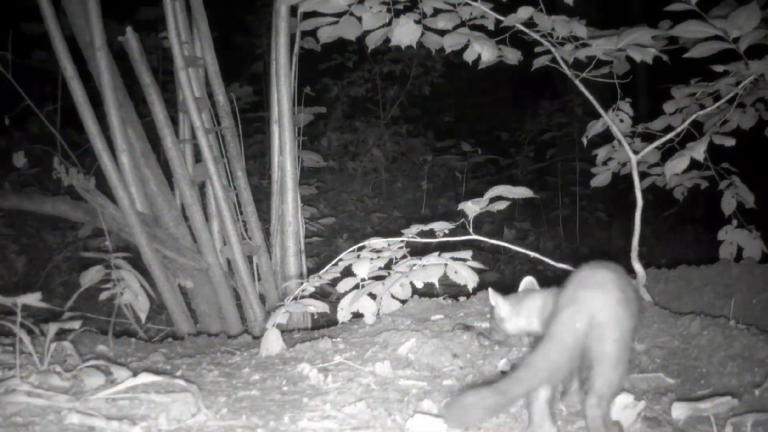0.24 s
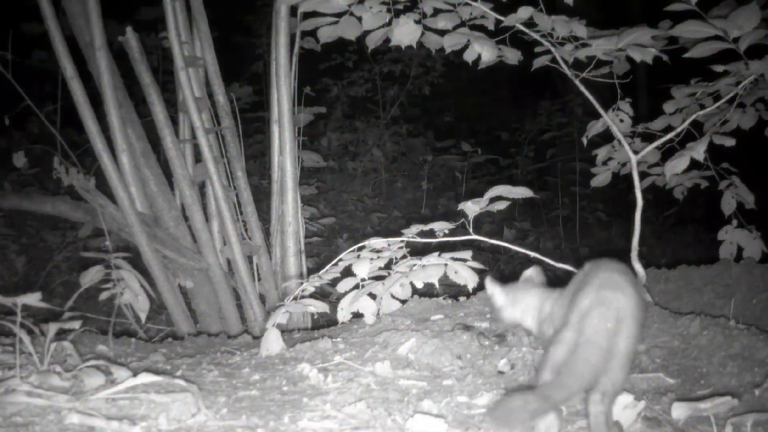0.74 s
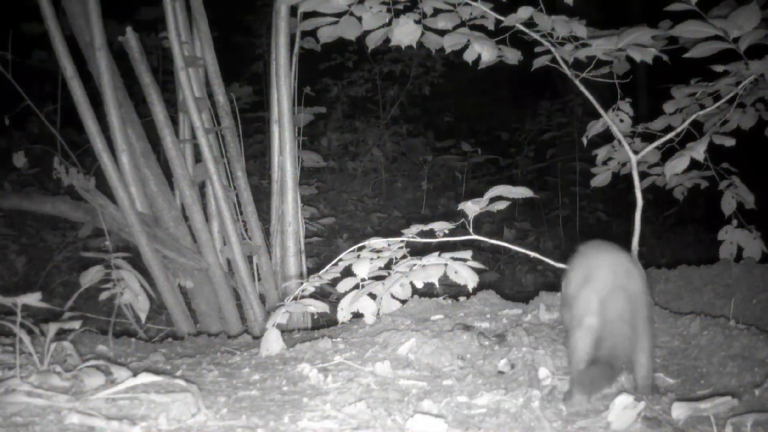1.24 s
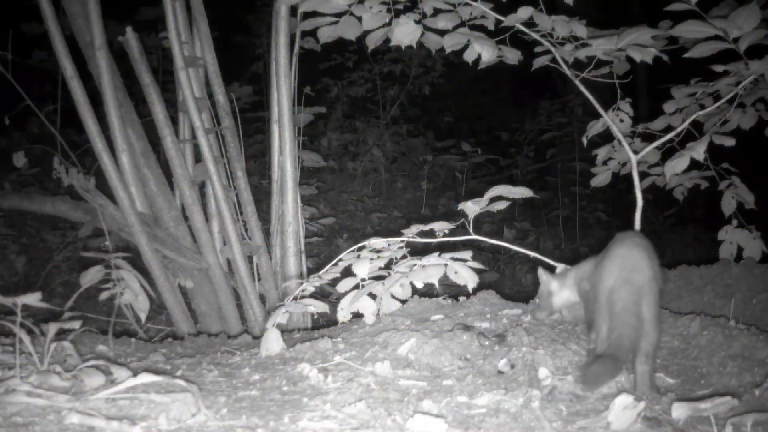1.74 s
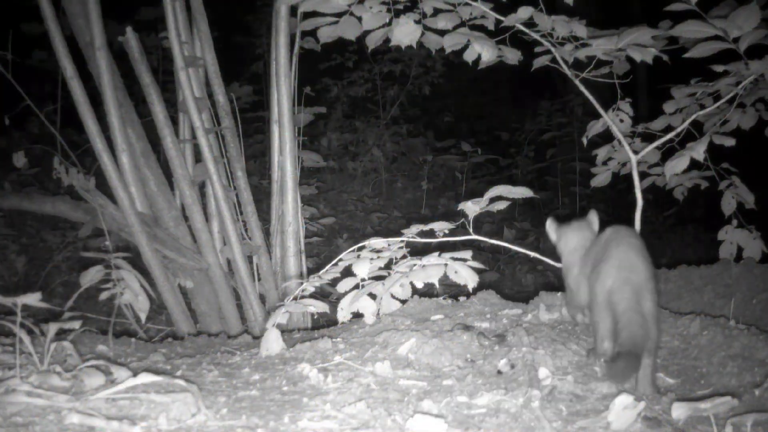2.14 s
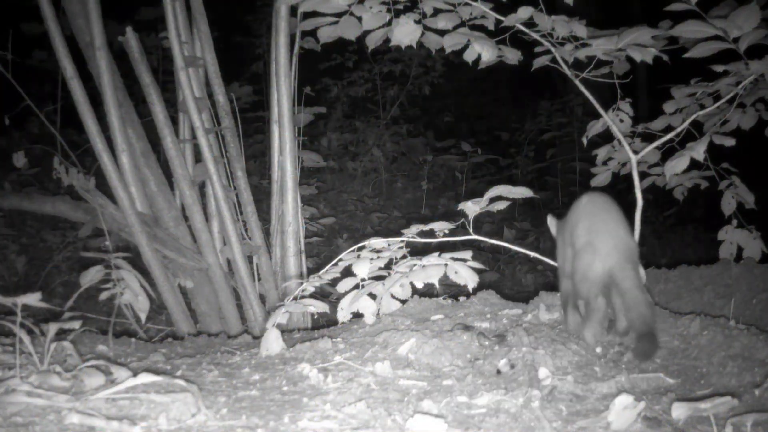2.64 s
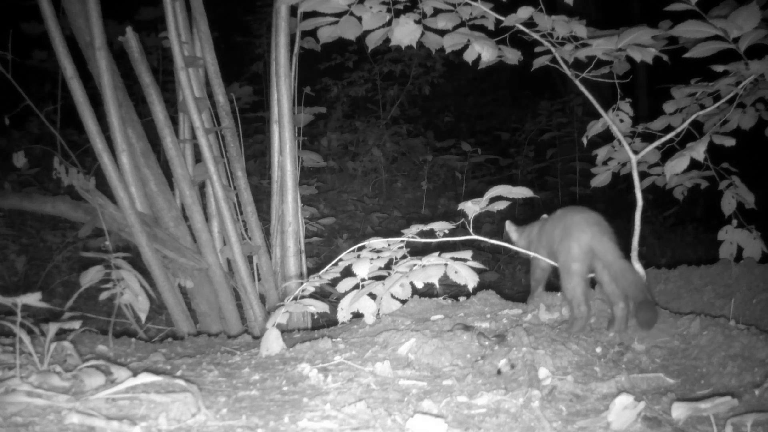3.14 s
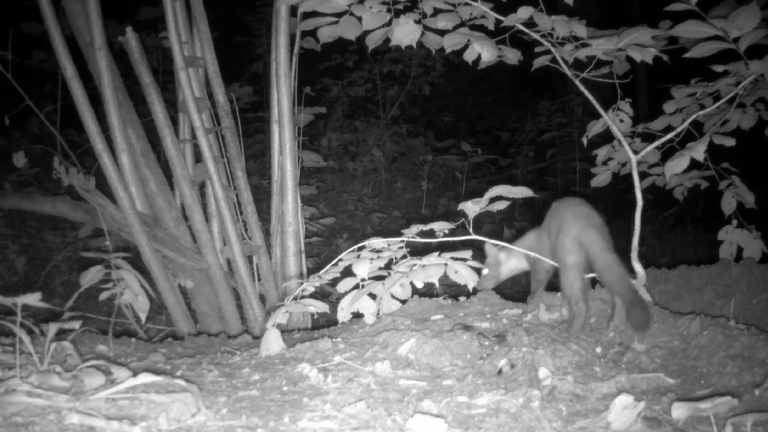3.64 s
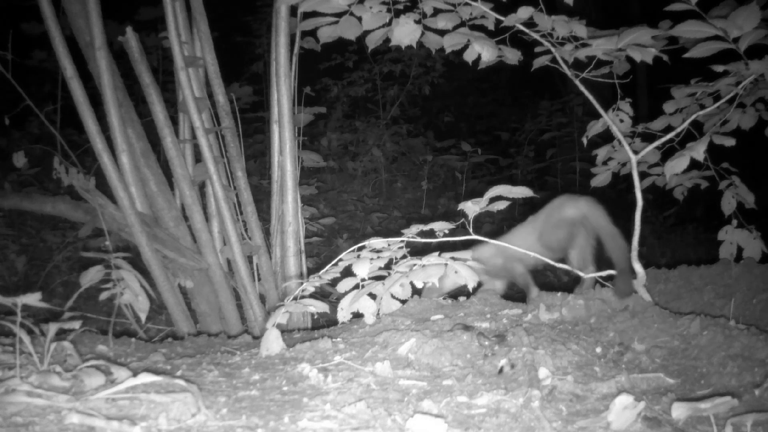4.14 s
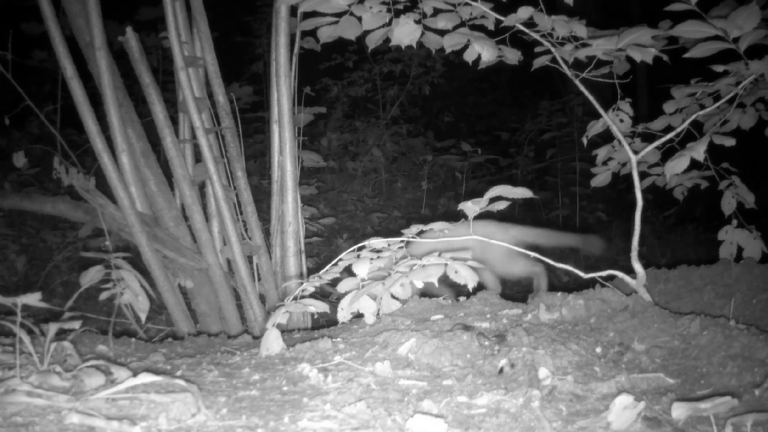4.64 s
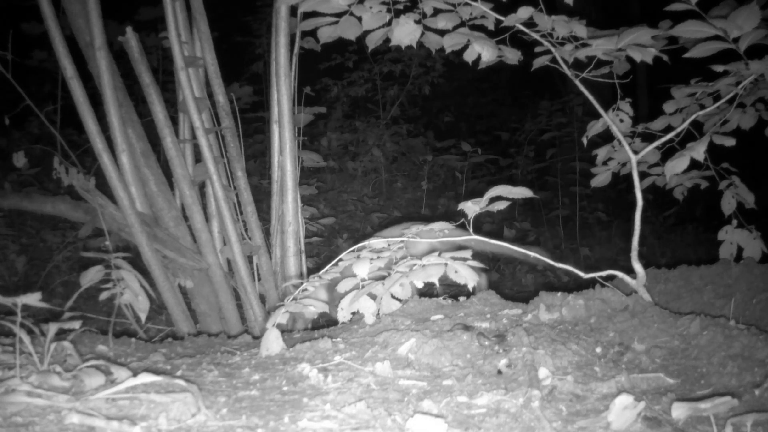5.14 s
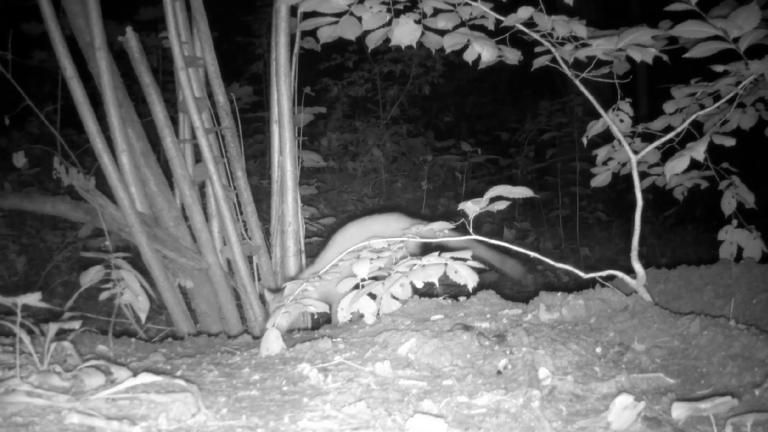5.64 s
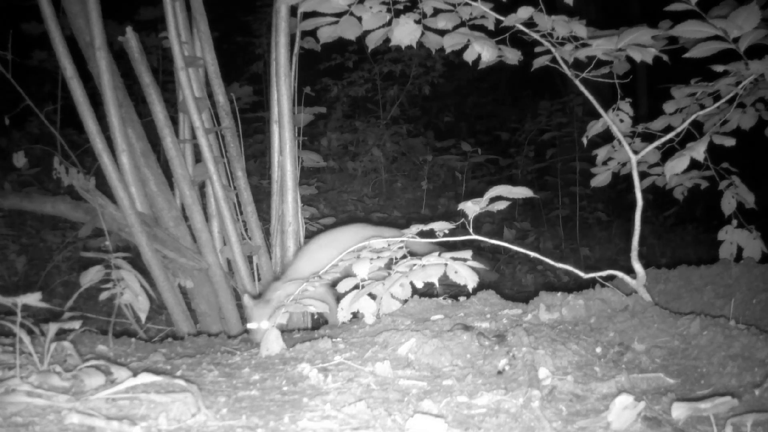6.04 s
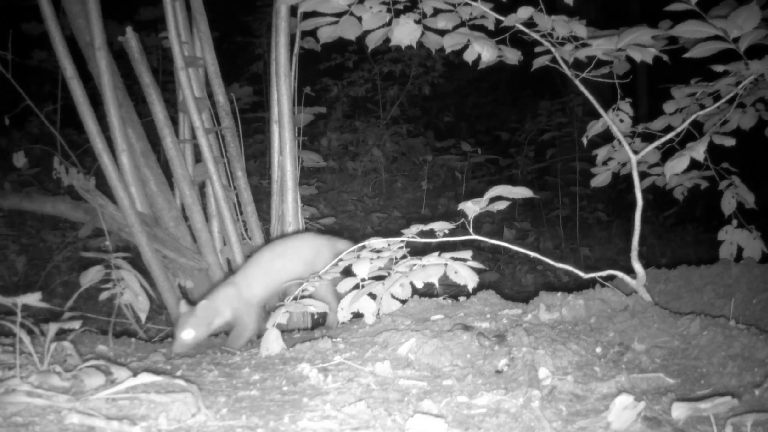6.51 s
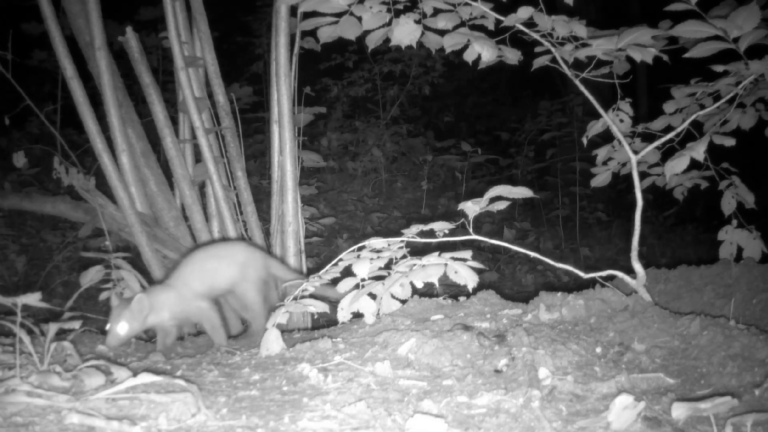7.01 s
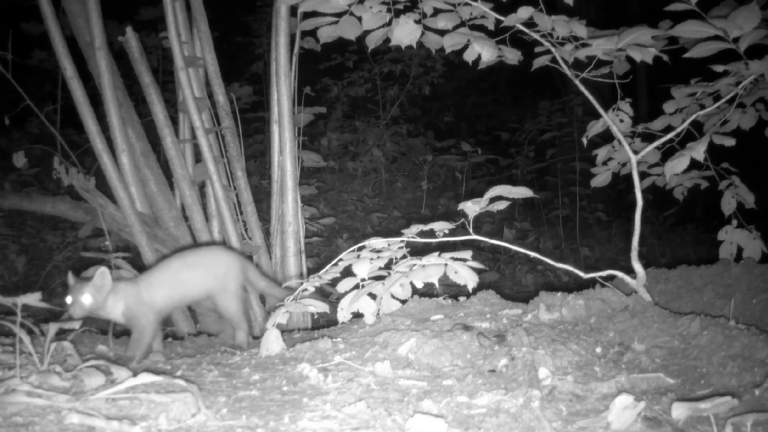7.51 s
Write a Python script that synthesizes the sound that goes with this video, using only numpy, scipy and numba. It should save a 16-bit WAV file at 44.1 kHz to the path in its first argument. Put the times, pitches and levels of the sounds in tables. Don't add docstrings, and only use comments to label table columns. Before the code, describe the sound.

Mellow pulsing cricket chirps, about two a second, over continuous insect trills, long raspy high katydid buzzes and a faint distant rumble.

```python
import sys
import numpy as np
from scipy import signal
from scipy.fft import rfft, irfft
from scipy.io import wavfile
from scipy.ndimage import uniform_filter1d
from numba import njit

SR = 44100
rng = np.random.default_rng(int(sys.argv[2]) if len(sys.argv) > 2 else 0)


def how_loud(loudness_db):
    steps = np.asarray(loudness_db, float) / 20
    return 10 ** steps


def to_wav(sig):
    pcm = np.clip(np.atleast_2d(sig), -1, 1) * 32767
    pcm = np.round(pcm).astype(np.int16)
    wavfile.write(sys.argv[1], SR, pcm.T)


N = 342657
TIME_S = np.arange(N) / SR


def level(x, db):
    return x * how_loud(db) / np.sqrt(np.mean(x ** 2))


def panned(x, pan_db):
    return x * how_loud(np.array([pan_db / 2, -pan_db / 2]).reshape(2, -1))


def walk(rate):
    hold = int(SR / rate)
    steps = np.repeat(rng.standard_normal(N // hold + 1), hold)
    return 1.3 * uniform_filter1d(uniform_filter1d(steps, hold), hold)[:N]


def colour(x, points):
    hz, db = np.transpose(points)
    f = np.fft.rfftfreq(x.shape[-1], 1 / SR) + 1
    return irfft(rfft(x) * how_loud(np.interp(np.log(f), np.log(hz), db)), x.shape[-1])


@njit
def resonance(x, hz, width_hz):
    y, band, low = np.empty(len(x)), 0., 0.
    for i in range(len(x)):
        g, damping = np.tan(np.pi * hz[i] / SR), width_hz / hz[i]
        v = (band + g * (x[i] - low)) / (1 + g * (g + damping))
        band, low, y[i] = 2 * v - band, low + 2 * g * v, damping * v
    return y


def woods(x, echo_db, t60_s, sway):
    t = np.arange(int(.5 * SR)) / SR
    shape = (2, 2, len(t))
    scatter = rng.standard_normal(shape) * how_loud(2.84 * rng.standard_normal(shape))
    echoes = scatter * np.minimum(t / 0.0038, 1) * how_loud(-60 * t / t60_s)
    echoes *= how_loud(echo_db) / np.sqrt(np.sum(echoes ** 2, axis=2, keepdims=True))
    source = np.atleast_2d(x).mean(axis=0)
    turn = np.cumsum(walk(5)) * sway / SR
    out = x
    for share, echo in zip((np.cos(turn), np.sin(turn)), echoes):
        out = out + signal.fftconvolve((source * share)[None], echo, axes=1)[:, :N]
    return out


def phrase(start, end, db, attack_s, lead_db, swell_s, release_s):
    hold_s = max(end - start - swell_s, 0)
    s = np.cumsum([start - attack_s, attack_s, swell_s, hold_s, release_s, release_s])
    return how_loud(db + np.interp(TIME_S, s, [-60, lead_db, 0, 0, -14, -60])) ** 2


def air():
    return level(colour(rng.standard_normal(N), [(12, 4), (22, 3.0), (40, 2), (80, -32.5)]), -58.0)


# (pitch_hz, level_db per Hz)
RUMBLE_TONE = [(21, -45), (35, -7), (64, -1), (204, -9.5), (249, -9.5), (306, -12.5), (362, -12),
               (401, -14), (1400, -22), (1950, -24), (2150, -20.5), (2600, -12.5), (4400, -120)]


def rumble():
    own = colour(rng.standard_normal((2, N)), RUMBLE_TONE) * how_loud(.3 * walk(3))
    shared = colour(rng.standard_normal(N), RUMBLE_TONE)
    shared = colour(shared, [(25, 2), (60, -3), (130, -9), (400, -28)])
    return (own + shared) / np.sqrt(np.mean(own ** 2)) * how_loud(-49.5)


# (pitch_hz, level_db per Hz)
CHORUS_TONE = [(2120, -9.5), (3700, -17), (4080, -17.5), (4590, -14.5), (5170, 0), (5540, -3.5), (6040, -4),
               (6720, -6.5), (8790, -9.5), (9240, -9), (10700, -7.5), (12900, -19.5), (16000, -29)]


def far_chorus():
    ears = np.zeros((2, N))
    for hz in 3600 * 2 ** np.arange(0, 2.3, 1 / 3):
        for ear in range(2):
            band = resonance(rng.standard_normal(N), np.full(N, hz), hz / 3)
            ears[ear] += how_loud(0.93 * walk(9)) * band
    return level(colour(ears, CHORUS_TONE), -44.5)


# (start_s, end_s, level_db)
CROAKS = [
    (1.62, 1.9, -72),
    (2.98, 3.28, -69),
    (4.33, 4.62, -69),
    (5.62, 5.95, -68),
    (7.02, 7.32, -66),
]


def frog():
    turn = np.cumsum(122 * (1 + .004 * walk(8))) / SR
    voice = sum(how_loud(db) * np.sin(2 * np.pi * multiple * turn) for multiple, db in [(2, 0.1), (3, 0.1)])
    power = sum(phrase(*croak, attack_s=.05, lead_db=2, swell_s=0.073, release_s=0.084) for croak in CROAKS)
    return woods(voice * np.sqrt(power), 0.1, 0.22, 3)


# (start_s, end_s)
BUZZES = [
    (.73, 2.085),
    (2.875, 4.25),
    (5.28, 6.705),
    (7.585, 8.5),
]
BUZZES_DB = [-41, -39.5, -40.5, -39]
# (wing pitch_hz, top band over main level_db, left minus right_db, top band pitch_hz)
BUZZ_VOICE = (10333, -21, 2.1, 14998)
# (start_s, end_s, level_db)
FAR_BUZZES = [
    (-.3, 0.017, -50),
    (2.1, 2.312, -55.5),
    (2.52, 2.9, -55),
    (4.847, 5.3, -54),
    (6.7, 7.512, -55),
]
FAR_VOICE = (10300, -19, .4, 14500)
# (start_s, end_s, level_db, top_band_db, left_minus_right_db)
RASPS = [
    (0.076, .22, -39.5, -10, 2),
    (0.288, 0.38, -39, -16, -3),
    (0.407, 0.463, -39, -19, -1),
    (4.56, 4.663, -43, -10, 4),
    (4.687, 4.724, -37, -8, 1.5),
    (4.774, 4.804, -40, -1.5, 2.1),
]


def katydid_controls():
    near = sum(phrase(*span, db, attack_s=.04, lead_db=-6.5, swell_s=.3, release_s=.115)
               for span, db in zip(BUZZES, BUZZES_DB))
    far = sum(phrase(*span, attack_s=.05, lead_db=-23, swell_s=.0335, release_s=.067) for span in FAR_BUZZES)
    singers = [(near, BUZZ_VOICE), (far, FAR_VOICE)]
    for start, end, db, top_db, pan_db in RASPS:
        power = phrase(start, end, db, attack_s=.03, lead_db=-10.5, swell_s=end - start, release_s=.075)
        singers.append((power, (10050, top_db, pan_db, 11900)))
    total = sum(power for power, voice in singers)
    blend = sum(power * np.reshape(voice, (-1, 1)) for power, voice in singers) / total
    return np.sqrt(total), *blend


# (pitch_hz, level_db)
WING_EDGE = [(10600, 0.8), (11800, 2), (12300, -1), (12800, -5)]


def katydid():
    strength, hz, top_db, pan_db, top_hz = katydid_controls()
    strikes, count = np.zeros(N), N // 40
    gaps = SR / 640 * (1 + .25 * rng.standard_normal(count).clip(-2, 2))
    at = np.cumsum(gaps).astype(int)
    inside = at < N
    strikes[at[inside]] = how_loud(0.98 * rng.standard_normal(count))[inside]
    wing = resonance(strikes, hz, 5600.0)
    wing = resonance(resonance(wing, hz - 500, 4900.0), hz + 300, 3400.0)
    top = resonance(resonance(strikes, top_hz, 3500.0), top_hz - 600, 4000.)
    song = strength * (level(colour(wing, WING_EDGE), 0) + how_loud(top_db) * level(top, -0.21))
    return panned(woods(song * how_loud(-9.5), 12.15, 0.15, 39.8), pan_db)


# (start_s, peak level_db, left_minus_right_db)
TICKS = [
    (7.1865, -11.2, -4.1),
    (7.2064, -11.6, -4.6),
    (7.2181, -13.8, -3.1),
    (7.2309, -14.7, -0.5),
    (7.2396, -12.3, -3.0),
    (7.2485, -14.2, -8.6),
    (7.2583, -14.3, -7.5),
    (7.2643, -19.3, 0.6),
]
# (delay_s, level_db)
TICK_ECHOES = [
    (.0033, -15),
    (.0085, -13),
    (.0128, -16),
]


def ticks():
    blows = np.zeros((2, N))
    for s, db, pan_db in TICKS:
        blows[:, int(s * SR)] = how_loud(db + 18.5) * how_loud(np.array([pan_db, 0]))
    blows = blows + sum(how_loud(db) * np.roll(blows, int(lag * SR), axis=1) for lag, db in TICK_ECHOES)
    hz = np.interp(TIME_S, [7.19, 7.26], [9900., 10700.])
    late = how_loud(np.interp(TIME_S, [7.2, 7.25], [-24, -9]))
    ears = []
    for blow in blows:
        ring = resonance(resonance(resonance(blow, hz, 5200.), hz, 5600.), hz, 6000.)
        top = resonance(blow * late, np.full(N, 14600.), 3600.)
        ears.append(ring + resonance(top, np.full(N, 14200.), 3900.))
    return woods(np.array(ears), 3.4, 0.3, 0)


def triller(hz, rate, spread_hz, duty):
    stroke = np.cumsum(rate * (1 + .012 * walk(3))) / SR % 1
    gate = np.sin(np.pi * np.clip(stroke / duty, 0, 1)) ** 2
    pitch_hz = hz * (1 + .004 * walk(6)) + spread_hz * (duty / 2 - stroke)
    tone = np.sin(2 * np.pi * np.cumsum(pitch_hz) / SR)
    return level(gate * how_loud(2.0 * walk(25)) * tone, 0)


# (pitch_hz, strokes_per_s, spread_hz, level_db, echo_db)
STEADY_SINGERS = [(2395, 49, 65, -50, 2), (3084, 67, 150, -67, 10), (3135, 33, 65, -61, 8),
                  (3455, 39, 90, -63.5, 3.5), (5460, 62, 250, -56.5, 15), (6824, 160, 200, -59.5, 3)]


def steady_trillers():
    return sum(level(woods(triller(hz, rate, spread_hz, .65), echo_db, 0.85, 29.94), db)
               for hz, rate, spread_hz, db, echo_db in STEADY_SINGERS)


# (start_s, end_s)
TRILL_SONGS = [
    (-.5, 2.26),
    (2.26, 4.78),
    (5.3, 7.45),
]
TRILL_SONGS_DB = [-50.5, -48.5, -49.5]
# (centre_s, half_width_s, depth_db)
TRILL_CATCHES = [
    (.33, 0.017, -6),
    (2.5, 0.012, -10),
    (2.64, 0.023, 0),
    (3.16, 0.053, -2),
    (3.66, .04, -4),
    (5.86, 0.057, -3),
]


def trill_level():
    songs = sum(phrase(*span, db, attack_s=.05, lead_db=-2, swell_s=.1, release_s=.05)
                for span, db in zip(TRILL_SONGS, TRILL_SONGS_DB))
    catches_db = sum(db * np.exp(-((TIME_S - s) / length) ** 2) for s, length, db in TRILL_CATCHES)
    rest = how_loud(-64) ** 2
    return np.sqrt(songs + rest) * how_loud(catches_db + .8 * walk(8))


# (pitch_hz, strokes_per_s, level_db)
TRILL_SINGERS = [(2830, 57, -18), (2885, 60, -12.5), (2920, 62, -20.5)]


def loud_trillers():
    pan_db = 3.5 + 1.8 * walk(4)
    trill = sum(level(woods(triller(hz, rate, 90, .75), 1.5, 0.29, 19.06), db)
                for hz, rate, db in TRILL_SINGERS)
    return panned(level(trill, 0) * trill_level(), pan_db)


STROKES_S = [0, .022, .048, .070, .092, .120, .142, .164]
STROKES_DB = [-5.5, -1.5, -2.5, -0.5, -1, -1.5, -1.6, -0.9]


def chirper(chirps, hz, fall_hz, rise_s, fade_s):
    half, lead_s = 900, .2
    out, t = np.zeros(N + SR), np.arange(-half, half) / SR
    shape = np.exp(-np.abs(t / np.where(t < 0, rise_s, fade_s)) ** 1.9)
    drop_hz = -fall_hz * np.exp(np.clip(t / 0.0079, -9, 1.2))
    for s, db, count in chirps:
        chance = rng.standard_normal((len(STROKES_S), 4))
        strokes = list(zip(STROKES_S, STROKES_DB, chance))[:int(round(count))]
        for lag, lift_db, c in strokes:
            turn = np.cumsum(hz + 8 * c[0] + drop_hz) / SR
            i = int((s + lag + .0008 * c[1] + lead_s) * SR)
            tone = np.sin(2 * np.pi * turn + 9 * c[3])
            out[i - half:i + half] += how_loud(db + lift_db + 1.1 * c[2]) * shape * tone
    return out[int(lead_s * SR):][:N]


# (start_s, level_db, strokes)
RIGHT_CHIRPS = [(-.07, -43, 8), (.363, -49, 8), (.836, -42.5, 8), (1.326, -43, 8), (1.748, -44.5, 8),
                (2.184, -38.5, 8), (2.627, -38, 8), (3.093, -39, 8), (3.516, -42, 8), (4.010, -39.5, 8),
                (4.515, -39, 8), (4.928, -41.5, 8), (5.372, -37, 8), (5.840, -42, 8), (6.357, -37.5, 5),
                (6.755, -40.5, 8), (7.224, -43, 8), (7.657, -42, 8)]
# (start_s, level_db, strokes)
BEHIND_CHIRPS = [(.400, -42.5, 8), (.908, -42, 8), (1.308, -42, 8), (1.700, -63, 8), (2.256, -38, 8),
                 (2.586, -50, 8), (3.075, -39, 8), (3.588, -37.5, 8), (3.972, -56, 8), (4.447, -44, 8),
                 (4.887, -42, 8), (5.444, -58, 8), (5.821, -38, 8), (6.290, -36, 8), (6.737, -42, 8),
                 (7.200, -40, 8), (7.674, -31.5, 8)]


def answering_crickets():
    right = chirper(RIGHT_CHIRPS, 2415, 41, 0.0075, 0.004)
    right = woods(panned(right, -18) * how_loud(-3.5), -1.5, 0.5, 7.95)
    behind = chirper(BEHIND_CHIRPS, 2450, 37, 0.007, 0.004)
    behind = woods(panned(behind, -7) * how_loud(-4), 1.5, 0.35, 8.2)
    return right + behind


# (start_s of first wing stroke, level_db, strokes)
NEAR_CHIRPS = [(-0.096, -36.5, 8), (0.336, -36, 8), (0.777, -33.5, 8), (1.224, -32.5, 8), (1.663, -31.5, 8),
               (2.088, -30.5, 8), (2.542, -29.5, 8), (2.981, -29.5, 8), (3.415, -30, 8), (3.849, -29.5, 8),
               (4.292, -29, 8), (4.734, -29, 8), (5.262, -31, 5), (5.619, -30, 8), (6.059, -29, 8),
               (6.495, -28.5, 8), (6.937, -28.5, 8), (7.385, -29.5, 8)]


def near_cricket():
    song = chirper(NEAR_CHIRPS, 2385, 47.7, 0.0095, 0.0038)
    return woods(panned(song, 7.5) * how_loud(-1.0), -16, 0.19, 5.9)


def scene():
    gain = how_loud(-8 * np.exp(-TIME_S / 1.36))
    background = panned(far_chorus() + rumble(), 1.5)
    steady = background + katydid() + steady_trillers() + loud_trillers()
    return steady * gain + air() + frog() + ticks() + answering_crickets() + near_cricket()


def band_limit(x):
    return signal.sosfilt(signal.butter(12, 15790, fs=SR, output="sos"), x)


def record(dry):
    top_cut = signal.ellip(10, .2, 70, 15740, fs=SR, output="sos")
    mix = signal.sosfilt(top_cut, dry)
    return band_limit(mix)


dry = scene()
out = record(dry)
to_wav(out)
```